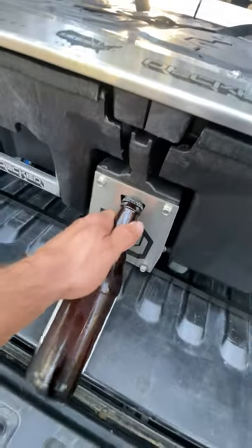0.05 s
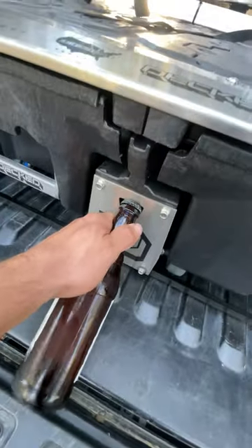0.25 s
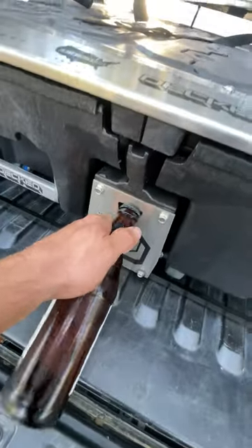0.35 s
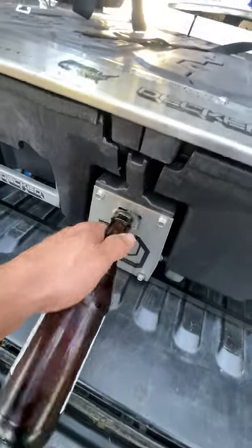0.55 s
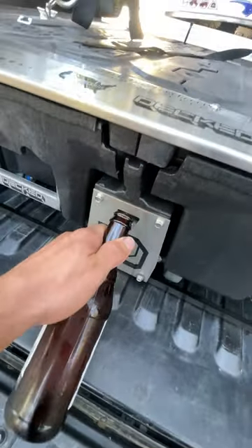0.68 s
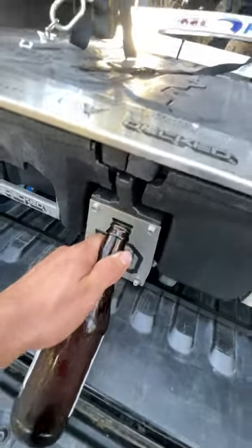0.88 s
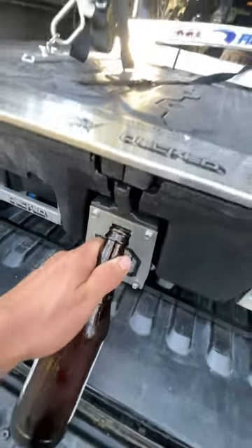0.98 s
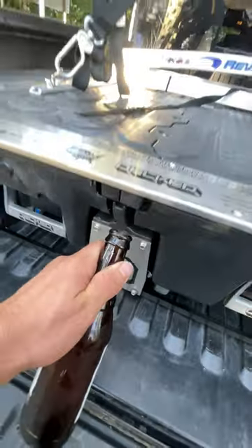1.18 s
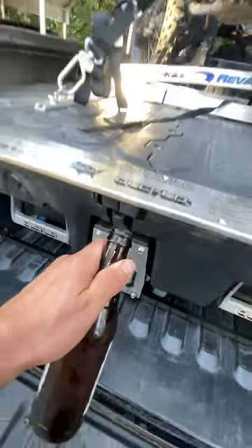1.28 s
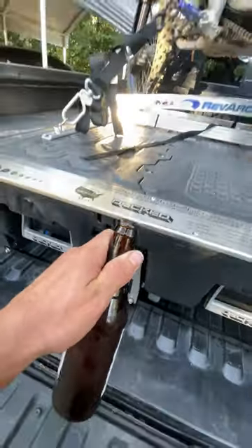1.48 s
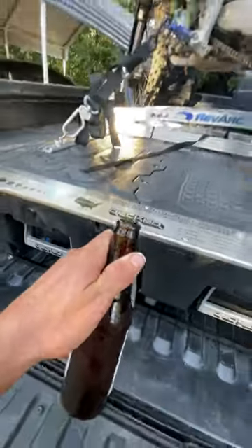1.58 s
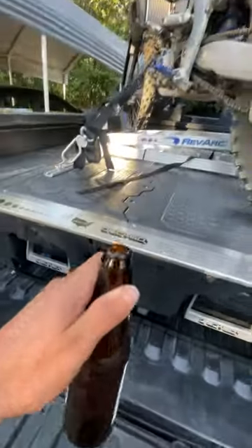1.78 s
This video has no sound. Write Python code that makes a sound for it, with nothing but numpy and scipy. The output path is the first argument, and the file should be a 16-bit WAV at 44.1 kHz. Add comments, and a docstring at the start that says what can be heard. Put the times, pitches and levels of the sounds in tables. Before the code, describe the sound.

A cap is pried off a glass bottle in a steel opener. Gas hisses briefly, the bottle knocks, the cap crunches, then cap and neck clack and clink against the opener. Heard close, outdoors, over a faint rumble.

```python
"""In a truck bed outdoors, a crown cap is levered off a glass bottle in a steel opener on a plastic drawer.
Over a low rumble the drawer grumbles under load, gas hisses from the lifted rim, the bottle slips with
a knock and the cap crunches as it bends. Cap and neck then clack and rub on the opener, ringing it and
thudding the drawer, until the cap comes free. Heard close, at two microphone ports."""
import sys
import numpy as np
from scipy import signal
from scipy.fft import rfft, irfft
from scipy.io import wavfile
from scipy.ndimage import uniform_filter1d

SR = 44100
rng = np.random.default_rng(int(sys.argv[2]) if len(sys.argv) > 2 else 0)


def store_wav(level_fs):
    """Save 16-bit WAV to argv[1]."""
    pcm = np.round(np.clip(np.atleast_2d(level_fs), -1, 1) * 32767)
    wavfile.write(sys.argv[1], SR, pcm.T.astype(np.int16))


N = 81585
TIME_S = np.arange(N) / SR
FREQ_HZ = np.maximum(np.arange(N + 1) * SR / (2 * N), 1)
PORT_SPLIT = np.array([[.5], [-.5]])  # half a difference to each port: left, right


def undb(db):
    """Decibels to gain."""
    return 10 ** (np.asarray(db) / 20)


def over_hz(points):
    """Interpolate a table over log frequency."""
    hz, values = np.array(points).T
    return np.interp(np.log(FREQ_HZ), np.log(hz), values)


def swell(points):
    """Gain of a level curve, silent outside it."""
    time_s, db = np.array(points).T
    return undb(np.interp(TIME_S, time_s, db)) * (TIME_S >= time_s[0]) * (TIME_S <= time_s[-1])


def shape(x, gain):
    """Filter by a gain per frequency."""
    return irfft(rfft(x, 2 * N) * gain)[..., :N]


# likeness of noise at the two ports (frequency [Hz], coherence [0-1])
PORT_COHERENCE = [(300, 1), (1900, .88), (3200, .4), (5000, .5), (8200, .7), (10500, .97)]

def noise(colour, envelope=1):
    """Enveloped noise, partly alike at the two ports; the colour is normalised to unit power."""
    coherence = np.clip(over_hz(PORT_COHERENCE), 0, 1)
    gain = undb(over_hz(colour))
    gain /= np.sqrt(np.mean(gain ** 2))
    mid = shape(envelope * rng.standard_normal(N), gain * np.sqrt((1 + coherence) / 2))
    side = shape(envelope * rng.standard_normal(N), gain * np.sqrt((1 - coherence) / 2))
    return np.array([mid + side, mid - side])


def chatter(colour, contacts, t60_s):
    """Grainy contact noise: each contact is hardest at first touch, holds, then dies away."""
    attack_s, snap_s, snap_db, grain_db = .00016, .00081, 2, 3
    power = np.zeros(N)
    for start_s, hold_s, db in contacts:
        age_s = np.maximum(TIME_S - start_s, 0)
        attack = np.minimum(age_s / attack_s, 1)
        touch_db = snap_db * np.exp(-(age_s / snap_s / 2) ** 2)
        decay_db = 60 * np.maximum(age_s - hold_s, 0) / t60_s
        power += (attack * undb(db + touch_db - decay_db)) ** 2
    roughness = uniform_filter1d(rng.standard_normal(N), size=15)
    grain = undb(grain_db * roughness / roughness.std())
    return noise(colour, np.sqrt(power) * grain / np.sqrt(np.mean(grain ** 2)))


def ring(modes, strikes, build_s, detune=.0035):
    """Struck modes: the grip chokes them, a weaker part rings on; low modes swell later."""
    grip_t60_s, free_db = .035, -12
    out = np.zeros(N)
    hz, mode_db, t60_s = np.array(modes).T[:, :, None]
    for start_s, strike_db, tilt_db_per_oct in np.broadcast(*strikes):
        first = int(start_s * SR)
        age_s = TIME_S[:min(N - first, SR // 3)]
        mistune, phase_turns = rng.standard_normal((2, len(modes), 1))
        waves = np.sin(2 * np.pi * (hz * (1 + detune * mistune) * age_s + phase_turns))
        gain = undb(strike_db + mode_db + tilt_db_per_oct * np.log2(hz / hz[0]))
        rise = 1 - np.exp(-age_s / (build_s + 1 / hz))
        fade = undb(-60 * age_s / grip_t60_s) + undb(free_db - 60 * age_s / t60_s)
        out[first:first + len(age_s)] += (gain * rise * fade * waves).sum(0)
    return out


# outdoor rumble spectrum (frequency [Hz], density [dB])
RUMBLE_COLOUR = [(22, -14), (50, -12.5), (75, 3.5), (170, -13.5), (750, -24), (1500, -29), (4400, -33.5),
                 (5400, -44.5), (16000, -61)]
# steady tones (frequency [Hz], RMS level [dB])
HUM_TONES = [(76, -62), (770, -69)]

def outdoors():
    """Distant rumble with a faint hum."""
    hum = sum(undb(db) * np.sqrt(2) * np.sin(2 * np.pi * (hz * TIME_S + rng.random()))
              for hz, db in HUM_TONES)
    return undb(-51.5) * noise(RUMBLE_COLOUR) + hum


# drawer grumble envelope (time [s], level [dB])
STRAIN_LEVEL = [(0, -52.5), (.075, -54.5), (.09, -33.5), (.105, -42.5), (.2, -58), (.29, -55.5)]
# grumble spectrum (frequency [Hz], density [dB])
STRAIN_COLOUR = [(40, -4.5), (90, 6.5), (150, -4), (230, 0), (320, -21), (3000, -74)]

def drawer_strain():
    """The plastic drawer grumbles as the hand loads it."""
    return noise(STRAIN_COLOUR) * swell(STRAIN_LEVEL)


# cap and neck hitting the opener
# (time [s], contact [s], clack [dB], drawer thud [dB], tick [dB], cap ring [dB], steel ring [dB])
BLOWS = [ (.070, 0.0026, -58, -45, -51.5, -81, -61), (0.418, 0.007, -27.5, -35, -51.5, -58.5, -47.5),
         (0.4256, 0.0035, -14.5, -16, -17, -29, -11), (0.712, 0.0058, -28, -47.5, -55.5, -46, -62),
         (0.7202, .0045, -14.5, -26, -17, -8.5, -15.5), (0.7407, 0.0061, -21, -38, -18, -10, -20.5),
         (0.8511, 0.0073, -26, -46.5, -35, -31.5, -35.5),
         (.884, 0.00586, -41.5, -46.5, -44.5, -52.5, -58.5),
         (1.1225, 0.003, -27, -41.5, -29.5, -14.5, -29.5), (1.382, 0.0099, -18, -29.5, -17, -14.5, -10),
         (1.4539, 0.011, -34.5, -41, -38.5, -42, -26.5)]
# contact noise spectra (frequency [Hz], density [dB])
CLACK_COLOUR = [(200, -15.5), (700, -10), (1400, -2), (2600, 1.5), (3500, 2.5), (5500, 4), (7000, -0.5),
                (8500, 3), (10000, -23.5), (12000, -19.5), (16000, -34)]
TICK_COLOUR = [(5000, -12), (9000, 6), (11000, 1.5), (13300, 2.5), (14400, -10), (15400, -6),
               (16500, -21.5)]
THUD_COLOUR = [(40, -44), (130, 0), (330, -0.5), (620, -2), (900, -1.5), (1500, -4), (2500, -7),
               (6000, -44.5)]
# modes of the struck parts (frequency [Hz], level [dB], free T60 [s])
DRAWER_MODES = [(165, -7, .26), (230, -4, .14), (420, -2, .15), (700, -7, .08), (778, -1, .12),
                (860, 0, .13), (1035, -4, .13), (1437, -2, .12), (2060, -12, .04)]
CAP_MODES = [(3985, 0, .04), (4320, -6, .07), (8080, -4, .06), (8450, -11, .05), (13650, -19, .04),
             (15020, -18, .035)]
OPENER_MODES = [(1070, -2, .05), (2330, -12, .08), (2860, -8, .09), (3700, -11, .1), (4845, -12, .11)]
NECK_MODES = [(3225, 1, .035), (3310, -7, .03), (8543, -10, .05)]

def blows():
    """Metal chatters on glass; cap and opener ring, the neck too once bare; the drawer thuds."""
    cap_free_s, ring_left_minus_right_db = 1.3, -5.5
    time_s, hold_s, clack_db, thud_db, tick_db, cap_db, steel_db = np.array(BLOWS).T
    clack = chatter(CLACK_COLOUR, zip(time_s, hold_s, clack_db), t60_s=.05)
    tick = chatter(TICK_COLOUR, zip(time_s, hold_s, tick_db), t60_s=.012)
    thud = chatter(THUD_COLOUR, zip(time_s, hold_s, thud_db), t60_s=.063)
    drawer = ring(DRAWER_MODES, (time_s, thud_db + 2, 0), build_s=.00065)
    tilt_db_per_oct = .75 * (clack_db - clack_db.max())  # gentler blows ring the cap duller
    cap = ring(CAP_MODES, (time_s, cap_db, tilt_db_per_oct), build_s=.0023)
    opener = ring(OPENER_MODES, (time_s, steel_db, 0), build_s=.003)
    bare = time_s > cap_free_s
    neck = ring(NECK_MODES, (time_s[bare], steel_db[bare], 0), build_s=.0017)
    pan = undb(PORT_SPLIT * ring_left_minus_right_db)
    return clack + tick + thud + drawer + (cap + opener + neck) * pan


# leak under the lifted rim (time [s], level [dB])
JET_LEVEL = [(.193, -53), (.197, -39.5), (.208, -33), (.224, -22.5), (.24, -19.5), (.257, -20), (.268, -32),
             (.28, -64.5)]
# jet spectrum (frequency [Hz], density [dB])
JET_COLOUR = [(400, -29.5), (1750, -24), (2050, -9.5), (2700, -5), (3300, -21), (4900, -7), (7000, -12),
              (12400, -1.5), (14300, -3), (16000, -21.5)]

def gas_jet():
    """The jet swells as the seal opens and stops when the pressure is spent."""
    return noise(JET_COLOUR) * swell(JET_LEVEL)


# jerks of the cap's skirt (time [s], length [s], scrape [dB], clink [dB])
BUCKLES = [(0.468, 0.007, -32, -37.5), (0.479, 0.011, -22, -20.5), (0.4936, 0.002, -25, -33),
           (0.4991, 0.0043, -14.5, -19), (0.5152, 0.011, -23.5, -23), (0.532, 0.004, -21, -20),
           (0.55, .002, -34.5, -41.5)]
# scrape spectrum (frequency [Hz], density [dB])
SCRAPE_COLOUR = [(60, -28.5), (600, -19), (2600, -7), (3200, -11), (4100, -3.5), (7000, -4.5), (8000, -0.5),
                 (10800, -9), (12700, -6.5), (14400, -10), (15800, -20)]
# cap pressed on the bottle (frequency [Hz], level [dB], free T60 [s])
PRESSED_CAP_MODES = [(2056, -10, .22), (3965, -7, .1), (4323, -4, .16), (6955, -9, .07), (7780, 0, .08),
                     (7990, -1, .06), (12680, -5, .07), (13650, -7, .06), (15750, -12, .05)]

def bending_cap():
    """The skirt buckles in short jerks, each scraping the glass lip and clinking the cap."""
    time_s, hold_s, scrape_db, clink_db = np.array(BUCKLES).T
    scrape = chatter(SCRAPE_COLOUR, zip(time_s, hold_s, scrape_db), t60_s=.037)
    clink = ring(PRESSED_CAP_MODES, (time_s, clink_db, 0), build_s=.001, detune=.0008)
    return scrape + clink


# light slides on the opener (time [s], length [s], rub [dB], ring [dB])
SLIDES = [(0.834, 0.015, -40, -37), (0.922, 0.01, -38.5, -48), (0.966, 0.014, -43.5, -27.5),
          (0.983, 0.014, -38.5, -28.5), (1.15, 0.0087, -38.5, -33.5), (1.16, 0.0024, -45.5, -33.5),
          (1.267, .01, -61.5, -45.5)]
# rub spectrum (frequency [Hz], density [dB])
RUB_COLOUR = [(150, -10), (1600, -7.5), (3500, -4.5), (4350, -4), (4900, -16), (8200, -23), (11000, -31)]
# the cap's two low modes (frequency [Hz], level [dB], free T60 [s])
RUBBED_CAP_MODES = [(3985, 0, .14), (4320, -1, .11)]

def sliding_cap():
    """The cap rubs and rings softly as it feels for the opener's edge."""
    time_s, hold_s, rub_db, ring_db = np.array(SLIDES).T
    rub = chatter(RUB_COLOUR, zip(time_s, hold_s, rub_db), t60_s=.072)
    return rub + ring(RUBBED_CAP_MODES, (time_s, ring_db, 0), build_s=.0087)


# reflection spectrum (frequency [Hz], density [dB])
TAIL_COLOUR = [(100, 6), (400, 8.5), (8000, -5), (14000, -20)]

def reflections(x, level_db, t60_s, onset_s):
    """A diffuse tail, duller than the direct sound."""
    fade_in = np.clip(TIME_S / onset_s - 1, 0, 1)
    tail = noise(TAIL_COLOUR) * undb(-60 * TIME_S / t60_s) * fade_in
    tail /= np.sqrt(np.sum(tail ** 2) / 2)
    return undb(level_db) * shape(x, rfft(tail, 2 * N))


# port phase difference (frequency [Hz], left minus right [rad])
PORT_PHASE = [(250, 0), (1030, -.7), (3000, 1.2), (3790, -.6), (4740, -1.3), (5170, 2.4), (6460, 1.08),
              (8610, 2.48), (9300, 2.4), (10900, 3.3), (14400, 6.09)]
# port level difference (frequency [Hz], left minus right [dB])
PORT_BALANCE = [(330, 1), (700, 4), (1290, -3), (2380, -3), (3900, -4), (4700, -0.5)]

def ports(air):
    """Sound reaches each port with its own phase and level."""
    phase_rad = np.interp(FREQ_HZ, *np.array(PORT_PHASE).T)
    balance = undb(PORT_SPLIT * over_hz(PORT_BALANCE))
    return shape(air, balance * np.exp(1j * PORT_SPLIT * phase_rad))


def scene():
    """The bottle sounds, their reflections off truck bed and yard, the rumble and the drawer's strain."""
    jet, crunch = gas_jet(), bending_cap()
    contacts = blows() + sliding_cap()
    # the hand shields the jet; the opener half hides the bending cap
    send = (contacts + undb(-4) * jet + undb(-6) * crunch).mean(0)
    truck_bed = reflections(send, level_db=-14, t60_s=.14, onset_s=.004)
    yard = reflections(send, level_db=-26.5, t60_s=.4, onset_s=.0033)
    return ports(jet + crunch + contacts + truck_bed + yard + outdoors() + drawer_strain())


def record(dry):
    """Soft saturation rounds the highest peaks; a steep low-pass cuts the top."""
    ceiling, cutoff_hz = .83, 16100
    lowpass = signal.ellip(10, .2, 80, cutoff_hz, fs=SR, output="sos")
    return signal.sosfilt(lowpass, ceiling * np.tanh(dry / ceiling))


dry = scene()
out = record(dry)
store_wav(out)
```